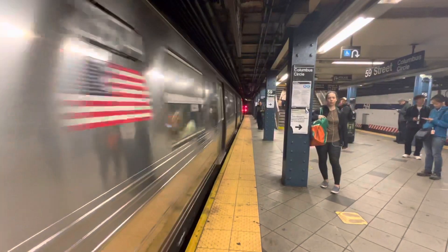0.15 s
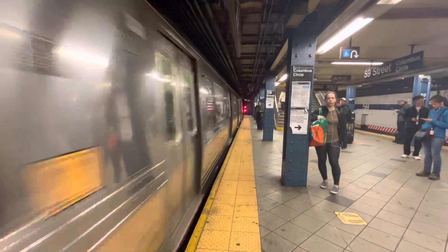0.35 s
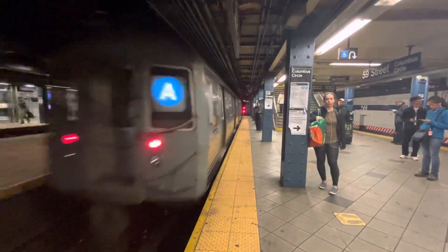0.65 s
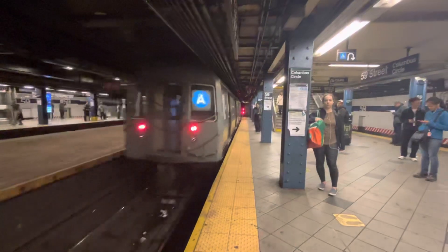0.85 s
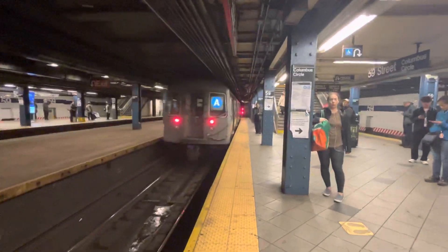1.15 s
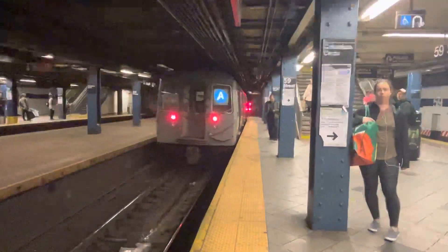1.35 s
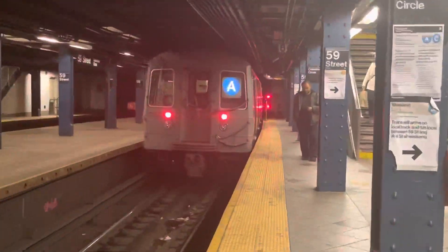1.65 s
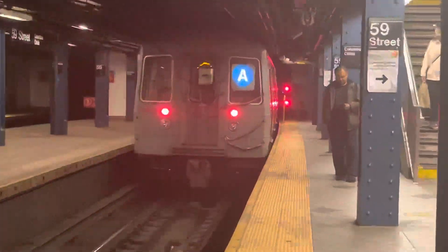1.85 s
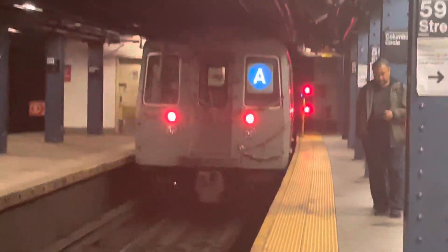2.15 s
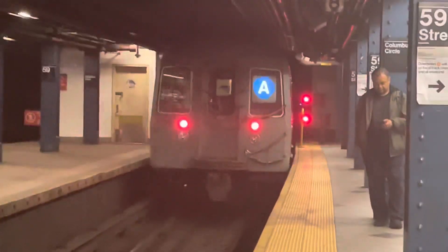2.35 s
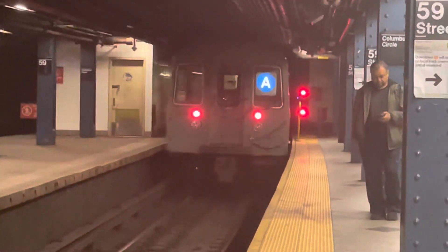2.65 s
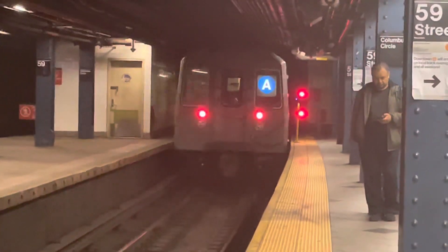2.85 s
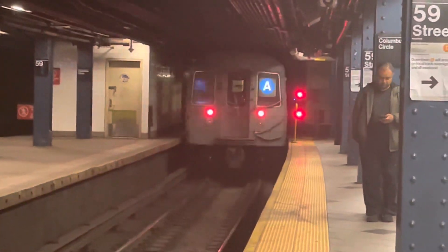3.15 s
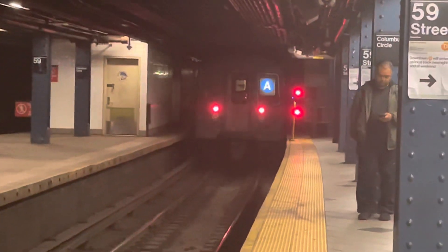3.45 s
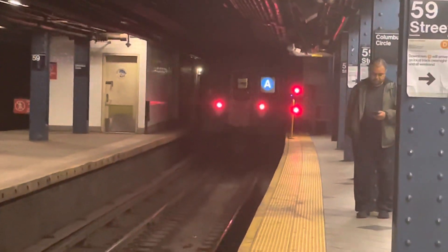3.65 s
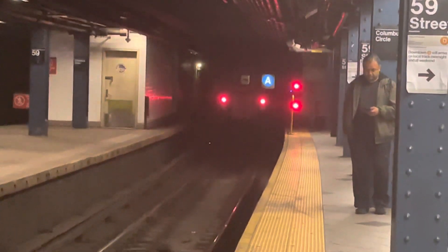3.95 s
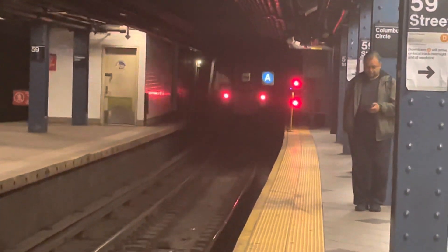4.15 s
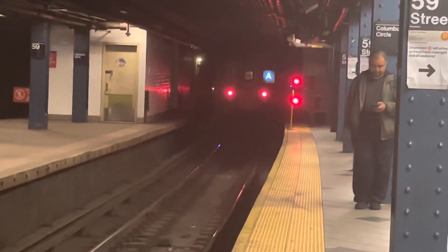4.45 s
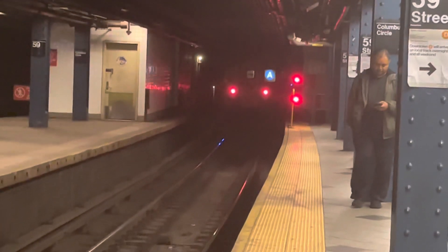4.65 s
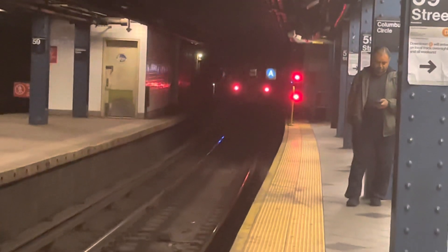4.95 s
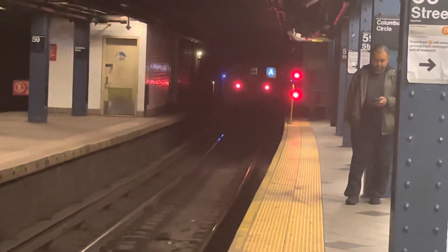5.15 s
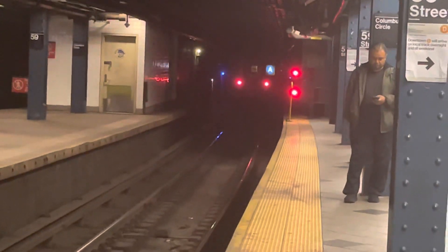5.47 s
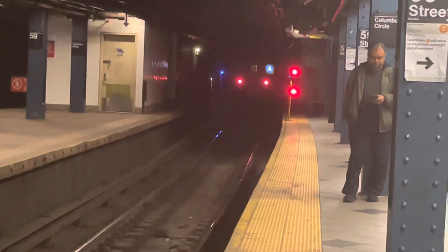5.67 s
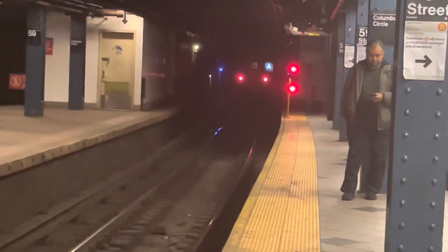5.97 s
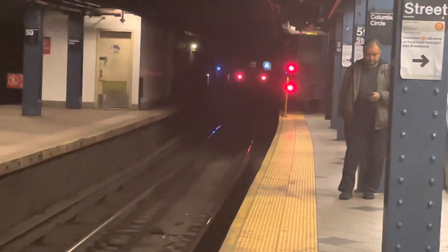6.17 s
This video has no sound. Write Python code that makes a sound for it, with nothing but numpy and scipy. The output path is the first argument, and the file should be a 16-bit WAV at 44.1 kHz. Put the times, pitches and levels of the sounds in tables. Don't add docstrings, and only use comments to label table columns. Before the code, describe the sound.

A subway train roars past the platform and away into its tunnel, wheels hissing and clacking over rail joints, with brief faint squeals and low rumble.

```python
import sys
import numpy as np
from scipy import signal
from scipy.fft import rfft, irfft, next_fast_len
from scipy.io import wavfile
from scipy.ndimage import uniform_filter1d

SR = 44100
rng = np.random.default_rng(int(sys.argv[2]) if len(sys.argv) > 2 else 0)


def gain_from_db(level_db):
    decades = np.asarray(level_db, float) / 20
    return 10 ** decades


def dump_mix(stems):
    frames = np.atleast_2d(stems).T
    limited = np.clip(frames, -1, 1)
    pcm = np.round(limited * 32767).astype(np.int16)
    wavfile.write(sys.argv[1], SR, pcm)


N = 278255
HZ, FRAME_S = np.fft.rfftfreq(256, 1 / SR), np.arange(N // 64 + 2) * 64 / SR


# time in seconds, level in dB.
TRAIN_LEVEL = [(0, 1), (.3, -.5), (.45, .5), (.86, 0.74), (1.26, 0), (1.67, -3), (1.92, 0), (2.2, -2.5),
               (2.6, -3.5), (3.0, -4.5), (3.42, -3.5), (3.75, -6.5), (3.95, -4), (4.4, -6), (4.7, -3.5),
               (5.0, -5.5), (5.4, -7), (6.31, -6)]


def train_level_db():
    return curve(TRAIN_LEVEL)


# time in seconds, share of the roar that comes from the tunnel.
TUNNEL_SHARE = [(0, 0.012), (1, 0.088), (2.3, 0.57), (3.5, 0.36), (5, 0.82), (6.31, 0.97)]


def tunnel_share():
    return np.clip(curve(TUNNEL_SHARE), 0, 1)


# frequency in Hz, level in dB per Hz.
NEAR_ROAR = [(70, -23), (120, -6.5), (165, -1.5), (240, 0.5), (350, -0.5), (450, -0.5), (550, -2),
             (950, -7.5), (1200, -19), (2000, -64), (5000, -99)]
# frequency in Hz, level in dB per Hz.
FAR_ROAR = [(70, -15), (120, -4), (165, 0), (280, -4), (400, -10.5), (550, -12.5), (950, -21), (1200, -32),
            (2000, -60), (5000, -93)]
# frequency in Hz, width in Hz, height in dB.
BODY_MODES = [(163.4, 15.5, 2.5), (201, 37, 2.5), (268, 17, 3), (351, 104, 3), (424, 37, 3), (490, 44, 0.5),
              (950, 50, 1.5)]


def rolling_roar():
    far = tunnel_share()
    near_roar = np.sqrt(1 - far) * coloured(NEAR_ROAR, BODY_MODES)
    far_roar = np.sqrt(far) * coloured(FAR_ROAR, BODY_MODES)
    roar = shaped(near_roar + far_roar, uneven(1.0, 0.18, frames=70))
    body_boom_db = 0.1 * booms_db()
    return gain_from_db(-21 + train_level_db() + body_boom_db) * roar


# frequency in Hz, level in dB per Hz.
HISS_SPECTRUM = [(600, -14), (1000, 1.5), (1400, 1), (2200, -3), (3000, -8.5), (4700, -15.5), (5600, -21),
                 (7500, -25.5), (9500, -32), (13000, -63)]


def wheel_hiss():
    hiss = shaped(wheels(HISS_SPECTRUM), uneven(0.44, 0.47, frames=60))
    return gain_from_db(-34.5 + 1.14 * train_level_db() + 0.23 * grinding_db()) * hiss


# frequency in Hz, level in dB per Hz.
SIZZLE_SPECTRUM = [(3000, -7), (5000, 2.5), (6300, 1.5), (8000, -1.5), (10500, -9), (12300, -12.5),
                   (14000, -21), (16000, -45)]


def wheel_sizzle():
    sizzle = shaped(wheels(SIZZLE_SPECTRUM), uneven(1.2, 0.76, frames=40))
    air_db = -6 * tunnel_share()
    return gain_from_db(-45.5 + 2.14 * train_level_db() + air_db + grinding_db()) * sizzle


# time in seconds, swell in dB, half length in seconds.
GRINDING = [
    (0.727, 3.5, 0.28),
    (1.93, 1.5, 0.14),
    (2.75, 5, .2),
    (6.152, 5, .15),
]


def grinding_db():
    return sum(swell_db(*row) for row in GRINDING)


# frequency in Hz, width in Hz, height in dB above the broad spectrum.
WHEEL_MODES = [(900, 90, 3), (1460, 80, 2), (1860, 130, 6.5), (2480, 150, 7), (3170, 190, 6),
               (3950, 190, 7), (4800, 140, 4.5), (5650, 100, 2), (6300, 200, 3.5)]


def wheels(spectrum):
    blur = 0.16 + 0.69 * tunnel_share() ** 1.5
    ringing = evened(shaped(coloured(spectrum, WHEEL_MODES), uneven(1.84, 0.066, frames=50)))
    return np.sqrt(1 - blur) * ringing + np.sqrt(blur) * coloured(spectrum)


# time in seconds, peak in dB, relative treble in dB, relative thump in dB.
JOINTS = [(0.0494, -22, -37, 7.5), (0.5894, -24.5, -26, 2), (0.7647, -19, -34, 8.5), (0.938, -14.5, -31, 1),
          (1.778, -21.5, -27.5, 5.5), (1.8594, -34, -16, -4), (1.949, -17, -31.5, 4.5),
          (2.0194, -27, -22, 6), (2.0794, -24, -29, 2), (2.2994, -29, -26, -6), (2.4544, -24, -29, 1),
          (2.8894, -26, -34, 9), (3.0584, -25.5, -30, 8.5), (3.4494, -30, -28.5, 0),
          (3.876, -23.5, -29.5, -1), (4.041, -20.5, -27.5, 2), (4.505, -27.5, -28, 2),
          (4.6734, -31, -33, 3), (5.1133, -31.5, -36, 5.5), (5.1696, -31, -33.5, 0),
          (5.5494, -31, -30.5, -15), (5.7186, -26, -29, -3), (6.0994, -33, -36, -20)]
# frequency in Hz, level in dB per Hz.
CLACK_SPECTRUM = [(150, -13.5), (400, 4), (1000, -1.5), (2000, -9.5), (4000, -17.5), (7000, -26.5),
                  (10000, -32), (12500, -37.5), (14000, -35), (16000, -56)]
# frequency in Hz, 60 dB decay time in seconds.
HALL_DECAY = [(200, 2), (1000, 0.72), (3000, 0.76), (6000, 0.97), (12000, 0.43)]


def joints():
    power = np.zeros((len(HZ), len(FRAME_S)))
    octaves = np.log2((HZ[:, None] + 50) / 2500)
    treble, thump = np.clip(octaves - 0.7, 0, 1.3), np.clip(-octaves - 0.8, 0, 1.5)
    very_top = np.clip(2 * octaves - 4.2, 0, 1)
    rise_s = 0.0054 + 0.0025 * np.clip(-octaves, 0, 4)
    for s, peak_db, treble_db, thump_db in JOINTS:
        age = np.maximum(FRAME_S - s + 0.0037, 0)
        tone_db = (treble_db + 29.5) * treble + (thump_db - 4.5) * thump / 0.97
        air_db = -7 * np.interp(s, *np.transpose(TUNNEL_SHARE)) * very_top
        tail = gain_from_db(-120 * age / read(HALL_DECAY, HZ)[:, None])
        crack = gain_from_db(-120 * age / 0.2)
        power += gain_from_db(2 * (peak_db - 13.5 + tone_db + air_db)) * (1 - np.exp(-age / rise_s)) * (tail + crack)
    rattle = uneven(2.3, 0.66, frames=12)
    return shaped(wheels(CLACK_SPECTRUM) * gain_from_db(7.0), np.sqrt(power) * rattle)


# start in seconds, length in seconds, width in Hz, level in dB.
SQUEALS = [(.5, 0.5, 700, -44), (0.62, .06, 140, -40), (.94, 0.091, 140, -54), (1.377, 0.069, 90, -43),
           (2.436, 0.085, 120, -59), (3.067, 0.083, 110, -49), (4.063, 0.11, 200, -52),
           (5.551, .07, 250, -54), (5.71, .06, 80, -49), (5.747, 0.38, 250, -66)]
SINGING_HZ = [6250, 4780, 4850, 3080, 11950, 4800, 5630, 4700, 1500, 7300]


def squeals():
    out = np.zeros((2, N))
    for hz, (s, length_s, width_hz, db) in zip(SINGING_HZ, SQUEALS):
        start, size = round(s * SR), round(length_s * SR)
        noise = rng.standard_normal((2, SR // 2))[:, :size]
        singing = evened(resonate(resonate(noise, hz, width_hz), hz, width_hz))
        fade = signal.windows.tukey(size, 0.4) * np.linspace(1, 0.45, size)
        out[:, start:start + size] += gain_from_db(db) * singing * fade
    return out


# time in seconds, tooth rate in Hz, level in dB.
GEAR_SPEED = [(0, 1028, -73), (.45, 1030, -69), (.62, 1030, -60), (1.25, 1029, -68), (1.6, 1038, -74),
              (2.4, 1050, -79), (5, 1074, -89), (6.31, 1080, -95)]
# multiple of the tooth rate, level in dB.
GEAR_LINES = [(4, 3), (5, 3.5), (6, -1), (7, -6), (8, -8), (9, -9), (10, 2), (11, -10), (12, -12)]


def gear_whine():
    tooth_hz, width_hz = curve(GEAR_SPEED), 45
    out = 0
    for multiple, db in GEAR_LINES:
        line_hz = multiple * tooth_hz
        fuzzy = resonate(rng.standard_normal((2, N)), line_hz, width_hz)
        fuzzy = resonate(fuzzy, line_hz, 2 * width_hz)
        broken_db = 3 * evened(uniform_filter1d(rng.standard_normal(N), size=3000))
        out = out + gain_from_db(db + broken_db) * evened(fuzzy)
    return gain_from_db(curve(GEAR_SPEED, order=2)) * out


# frequency in Hz, level in dB per Hz.
RUMBLE_SPECTRUM = [(15, -62), (25, -27), (32, -13), (45, 1.5), (65, 4.5), (95, 4.5), (125, -0.5),
                   (180, -13), (300, -48), (900, -97)]


def tunnel_rumble():
    rumble = coloured(RUMBLE_SPECTRUM, [(59.5, 8, 3.5), (50, 10, 2.0)])
    return gain_from_db(-31.5 + 0.11 * train_level_db() + booms_db()) * rumble


# time in seconds, swell in dB, half length in seconds.
BOOMS = [(0.298, 2, .08), (.8, 2.5, 0.21), (1.823, 3, 0.041), (2.104, 2, .06), (2.402, 2.5, 0.071),
         (2.975, 3.5, 0.085), (3.477, 7, .04), (3.93, 3, 0.028), (4.43, 5.5, 0.061), (4.69, 10, 0.042),
         (4.954, 8.5, 0.099), (5.868, 2.5, 0.27), (6.3, 5.5, .1)]


def booms_db():
    return sum(swell_db(*row) for row in BOOMS)


def swell_db(s, db, width_s):
    return db * np.exp(-((np.arange(N) / SR - s) / width_s) ** 2)


def evened(x):
    return x / np.sqrt(np.mean(x ** 2) + 1e-20)


def read(points, hz, order=1):
    table = np.transpose(points)
    return np.interp(np.log(hz + 1), np.log(table[0] + 1), table[order])


def curve(rows, order=1):
    table = np.transpose(rows)
    return np.interp(np.arange(N) / SR, table[0], table[order])


def coloured(spectrum, modes=()):
    size = next_fast_len(N)
    hz = np.fft.rfftfreq(size, 1 / SR)
    bumps_db = sum(db / (1 + (2 * (hz - f) / width) ** 2) for f, width, db in modes)
    noise = rfft(rng.standard_normal((2, size)))
    return evened(irfft(noise * gain_from_db(read(spectrum, hz) + bumps_db))[:, :N])


def shaped(x, gain):
    z = signal.stft(x, nperseg=256, noverlap=192)[2]
    return signal.istft(z * gain[:, :z.shape[2]], nperseg=256, noverlap=192)[1][:, :N]


def uneven(patchy_db, flicker_db, frames):
    field = rng.standard_normal((len(FRAME_S), len(HZ))).T
    across_bins = uniform_filter1d(field, size=4, axis=0)
    patches = evened(uniform_filter1d(across_bins, size=frames, axis=1))
    flicker = evened(uniform_filter1d(rng.standard_normal(len(FRAME_S)), size=frames // 2))
    return gain_from_db(patchy_db * patches + flicker_db * flicker)


def resonate(x, hz, width):
    turn = np.exp(2j * np.pi * np.cumsum(hz * np.ones(x.shape[-1])) / SR)
    r = np.exp(-np.pi * width / SR)
    return 2 * (turn * signal.lfilter([1 - r], [1, -r], x / turn)).real


def scene():
    rolling = rolling_roar() + wheel_hiss() + wheel_sizzle() + tunnel_rumble()
    return rolling + joints() + squeals() + gear_whine()


def low_pass(x):
    return signal.sosfilt(signal.butter(12, 13850, fs=SR, output="sos"), x)


# frequency in Hz, left-right likeness from 0 to 1,
# phase by which right leads in radians, left minus right in dB.
WIDE_PAIR = [(60, .97, 0, -.5), (150, .92, -.15, -1), (300, .7, -.4, -.5), (600, .36, -.8, 2),
             (1100, .4, -.4, 2), (1600, .1, 0, 1), (2500, .1, -2.5, -1.5), (4500, .12, 1, 3),
             (6300, .5, .9, -.5), (8000, .25, -1.5, 0), (10000, .4, -.7, -1), (10700, 1, 0, 0),
             (13000, 1, 0, 0), (14200, .9, 3.1, 0)]
# frequency in Hz, likeness, right's lead in radians, left minus right in dB.
ZOOMED_PAIR = [(60, .99, 0, -.4), (170, .96, 0, -.6), (330, .85, -.1, -.5), (650, .6, -.1, 0),
               (1000, .68, 0, -1.5), (1650, .15, .5, -5.5), (2500, .87, -.3, -2), (3300, .985, -.15, 0),
               (5150, 1, 0, 0), (5700, .9, .9, 0), (7200, .85, 1.5, 0), (7950, .99, 3.0, 0),
               (8950, .99, 3.3, 0), (9800, .75, 4.5, 0), (11100, 1, 6.283, 0), (13100, 1, 6.283, 0),
               (14000, .9, 9.2, 0)]
# frequency in Hz, start in seconds, length in seconds.
ZOOM = [
    (5500, 1.41, 0.22),
    (7000, 1.31, .07),
]


def record(dry):
    hz, t, (a, b) = signal.stft(dry, SR, nperseg=1024, noverlap=768)
    start_s, length_s = (read(ZOOM, hz, order=k)[:, None] for k in (1, 2))
    zoom = np.clip((t - start_s) / length_s, 0, 1)
    pair = 0
    for table, share in ((WIDE_PAIR, 1 - zoom), (ZOOMED_PAIR, zoom)):
        same, lead, lean_db = (read(table, hz, order=k)[:, None] for k in range(1, 4))
        common, opposed = np.sqrt((1 + same) / 2) * a, np.sqrt((1 - same) / 2) * b
        left = (common + opposed) * gain_from_db(lean_db / 2)
        right = (common - opposed) * np.exp(1j * lead) * gain_from_db(-lean_db / 2)
        pair = pair + share * np.array([left, right])
    mix = signal.istft(pair, nperseg=1024, noverlap=768)[1][:, :N]
    return low_pass(mix)


dry = scene()
out = record(dry)
dump_mix(out)
```